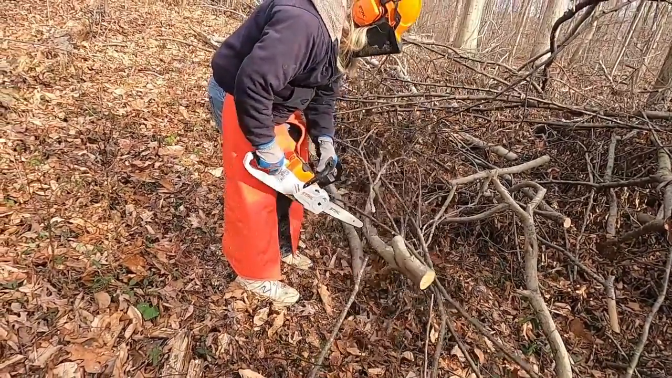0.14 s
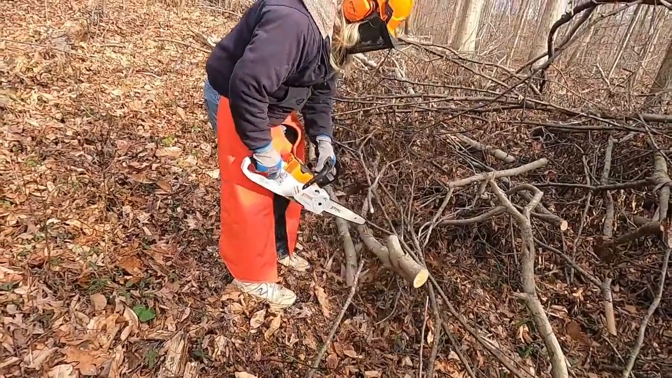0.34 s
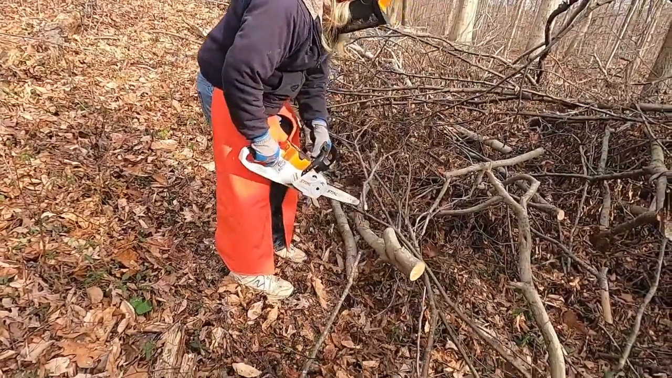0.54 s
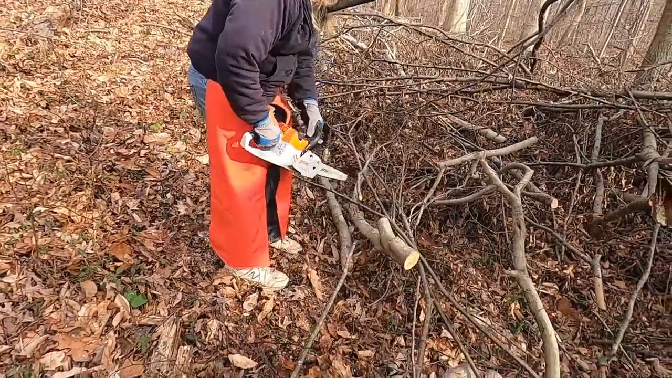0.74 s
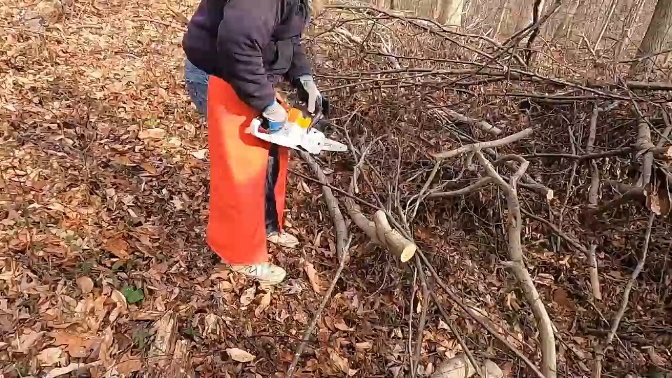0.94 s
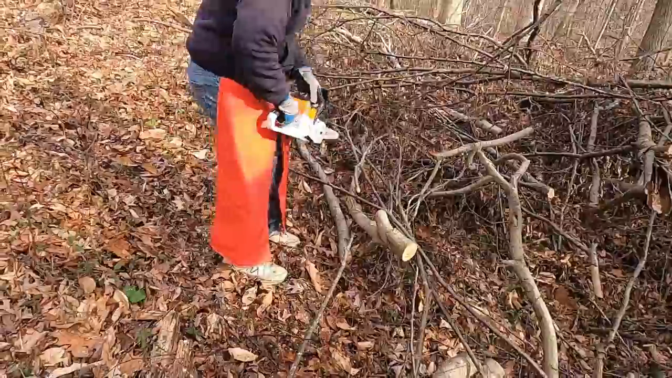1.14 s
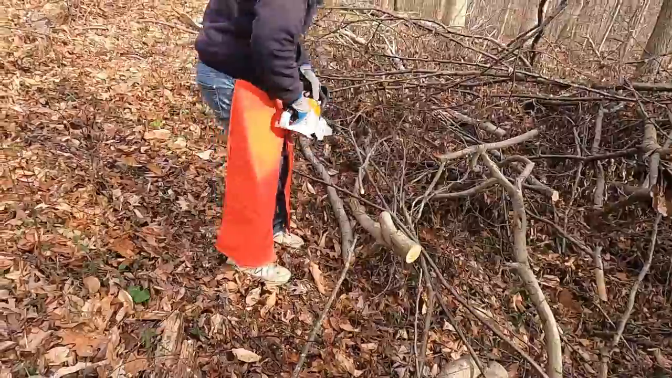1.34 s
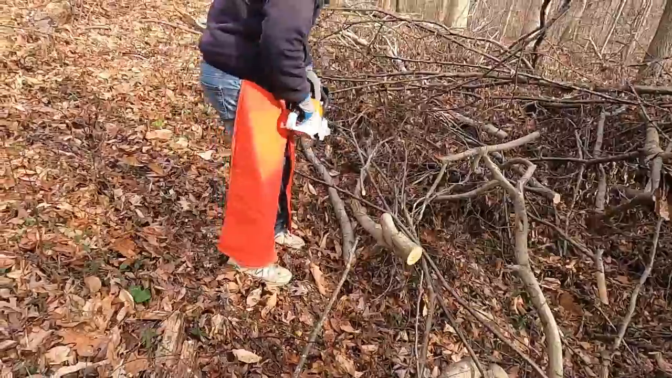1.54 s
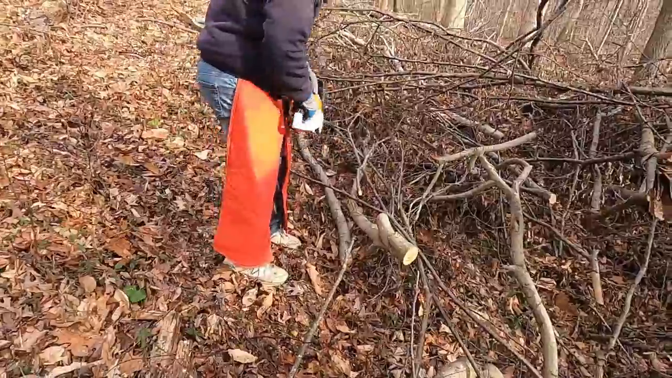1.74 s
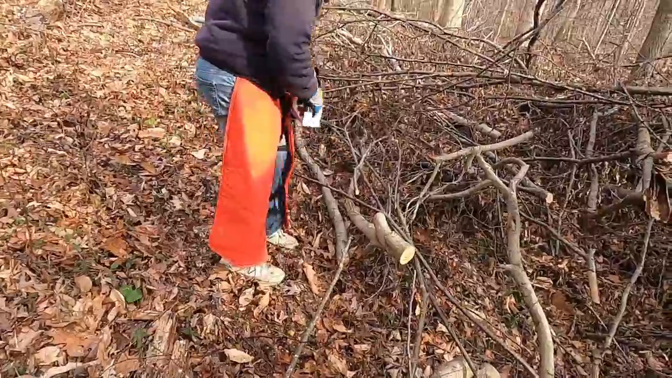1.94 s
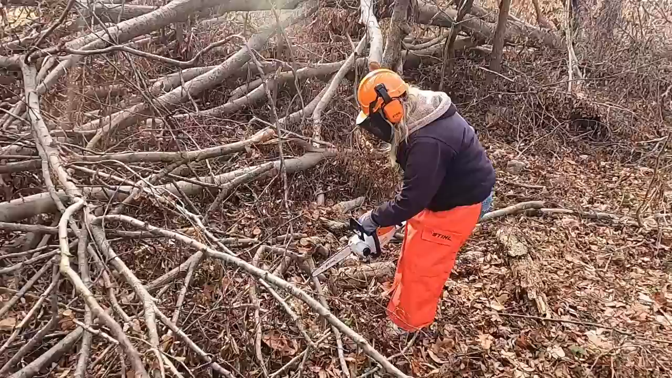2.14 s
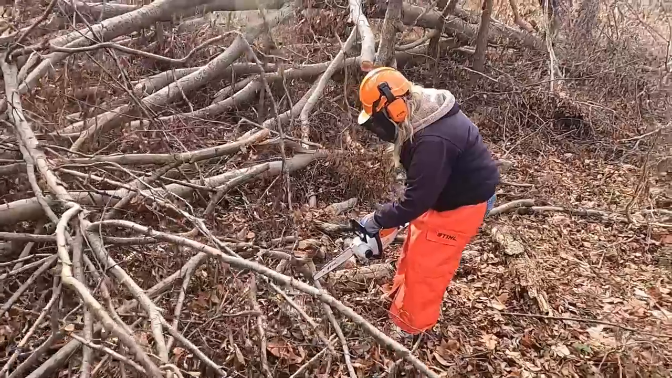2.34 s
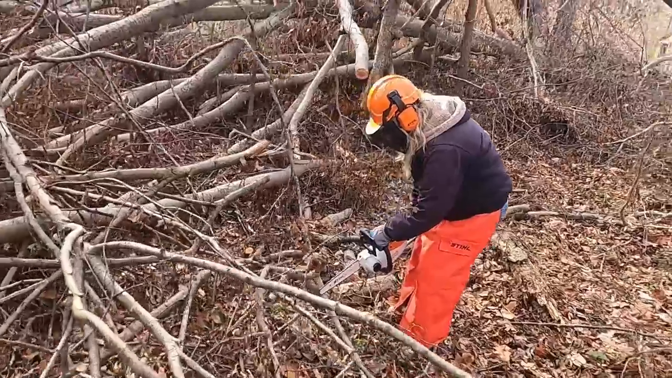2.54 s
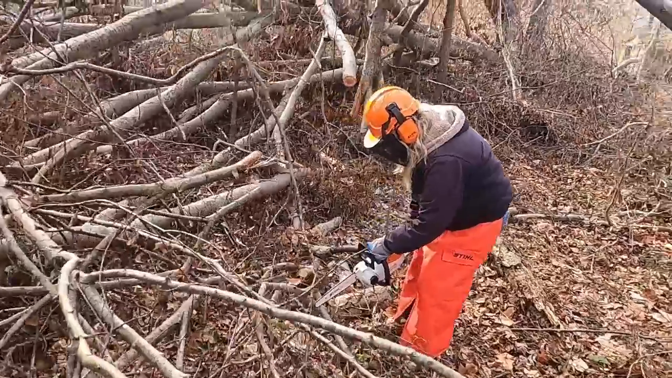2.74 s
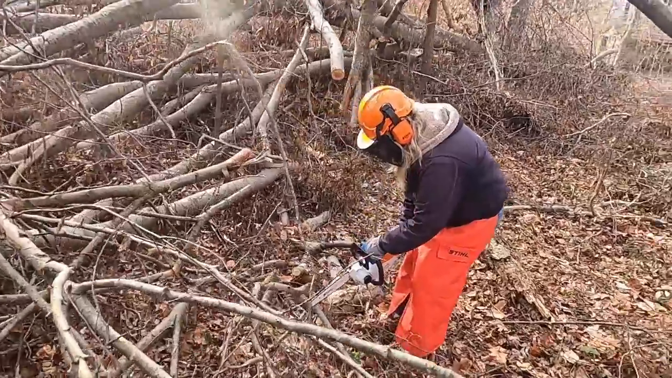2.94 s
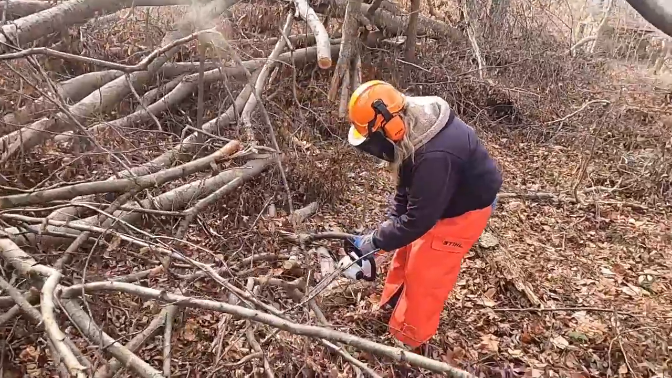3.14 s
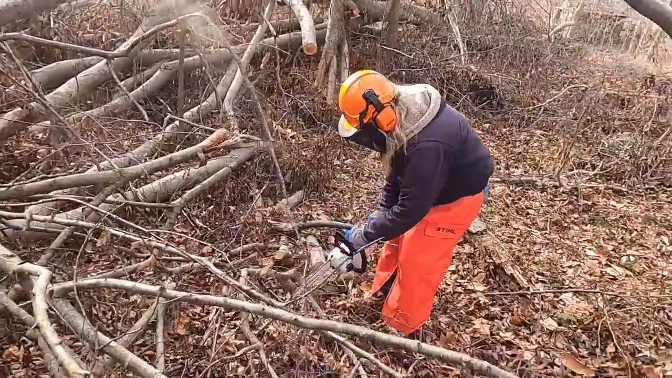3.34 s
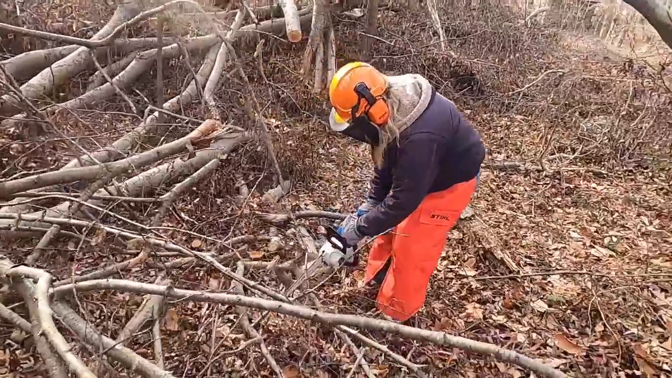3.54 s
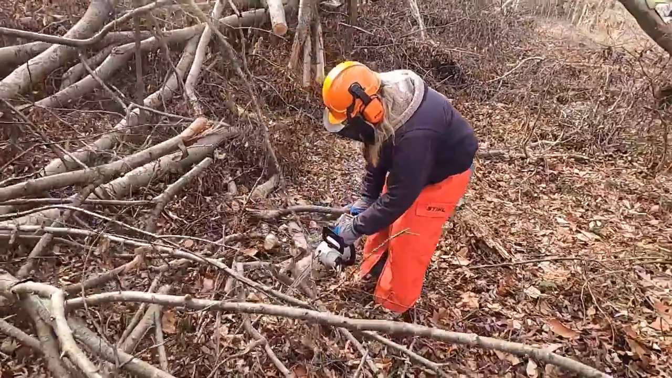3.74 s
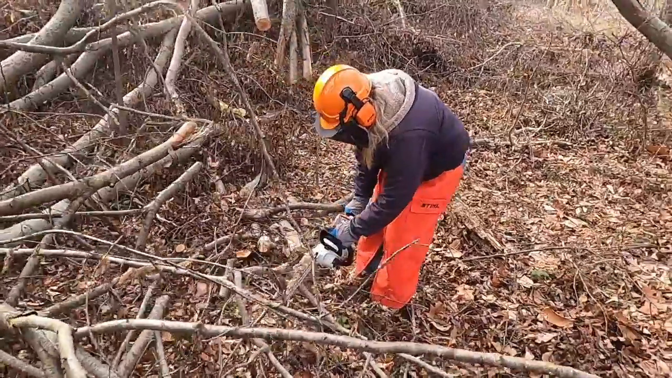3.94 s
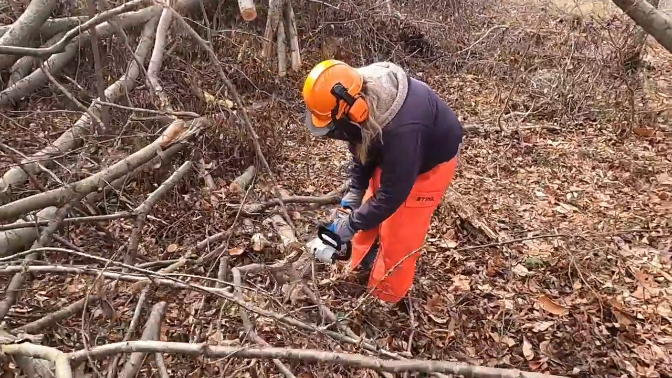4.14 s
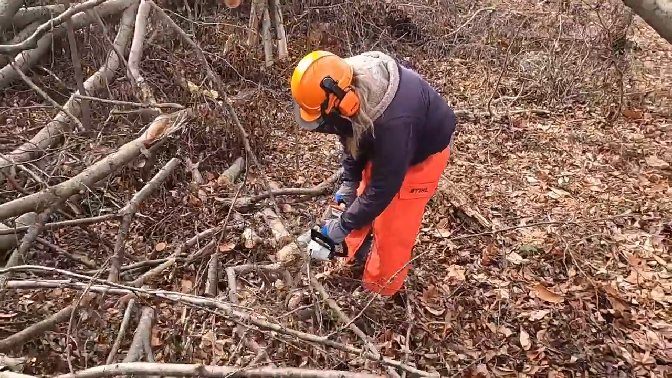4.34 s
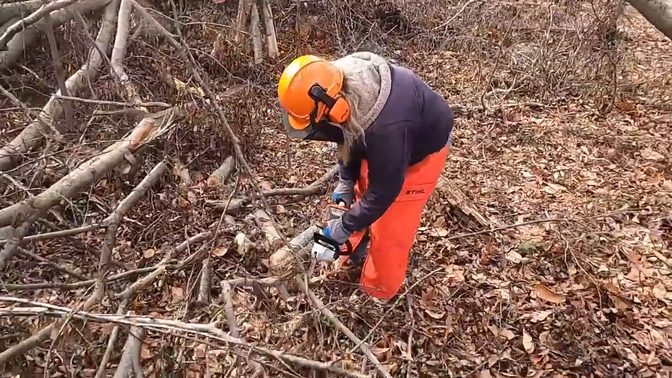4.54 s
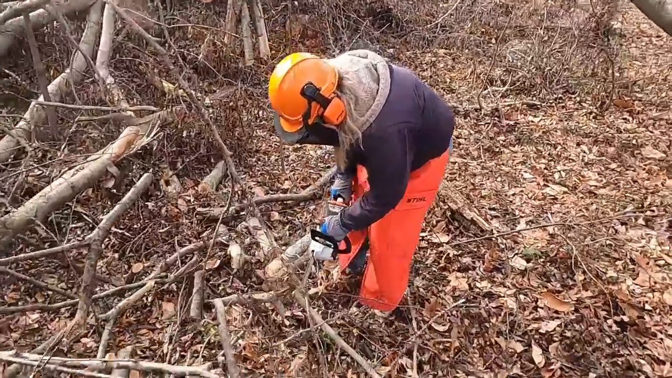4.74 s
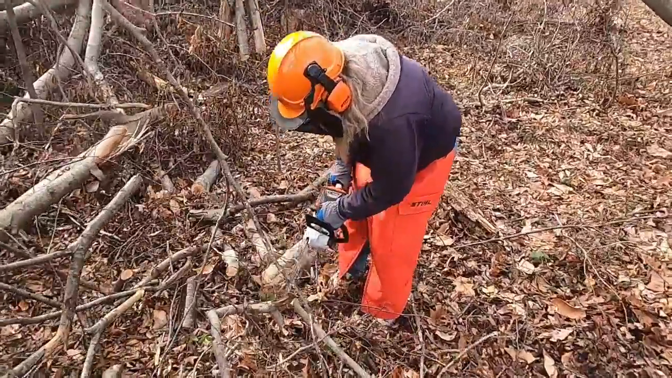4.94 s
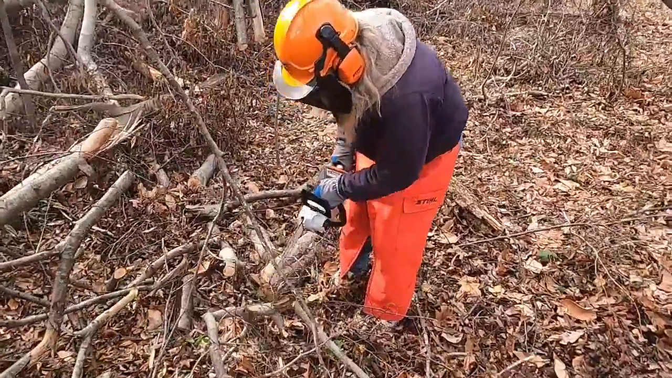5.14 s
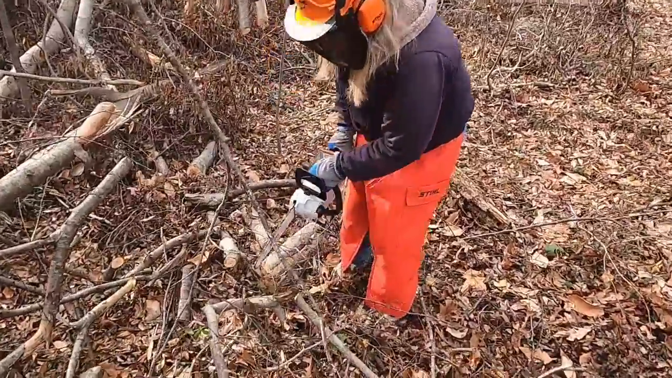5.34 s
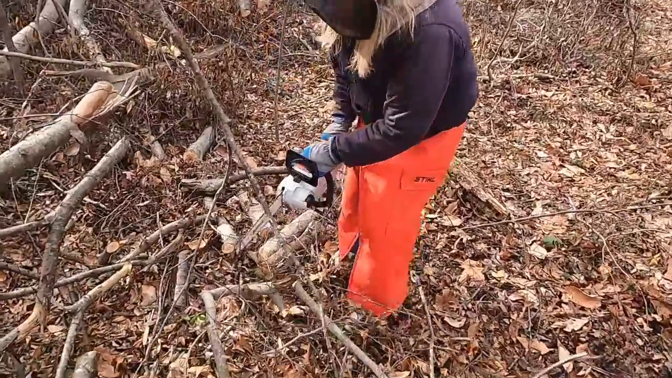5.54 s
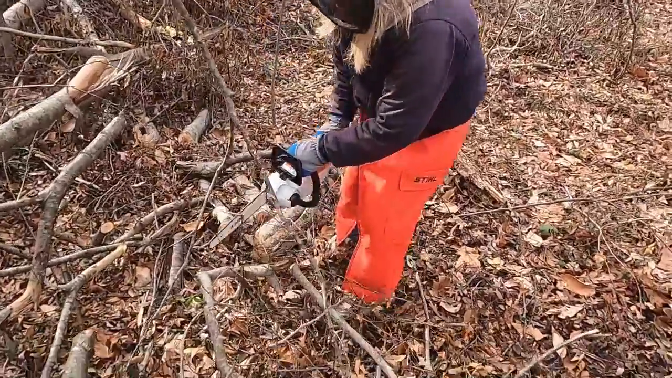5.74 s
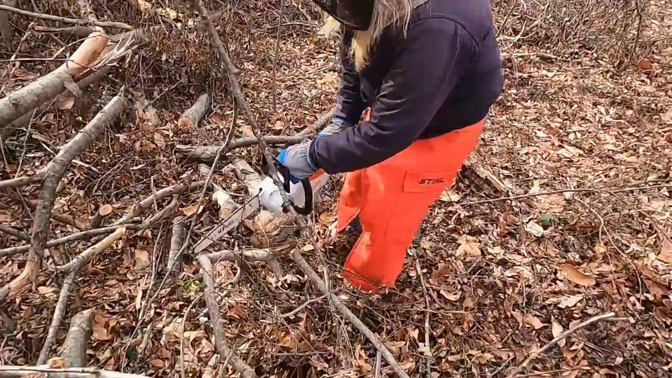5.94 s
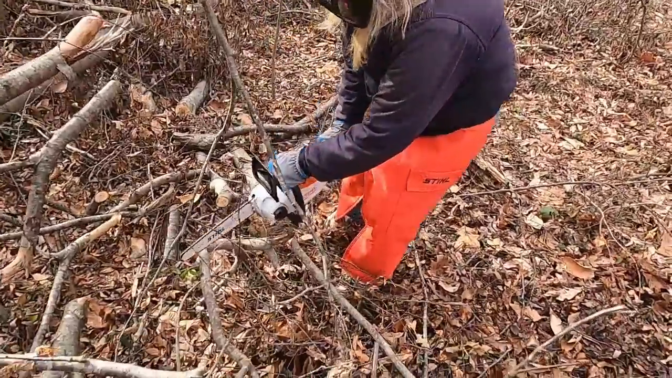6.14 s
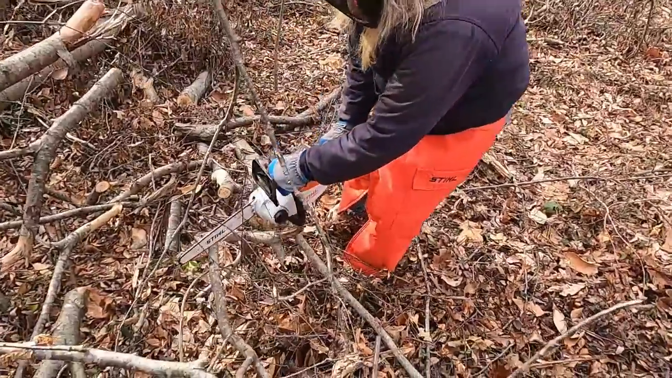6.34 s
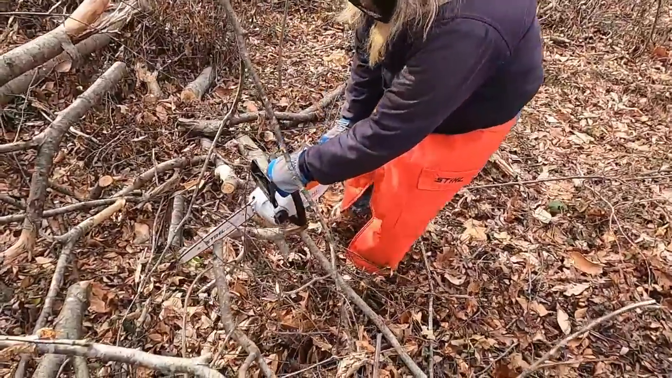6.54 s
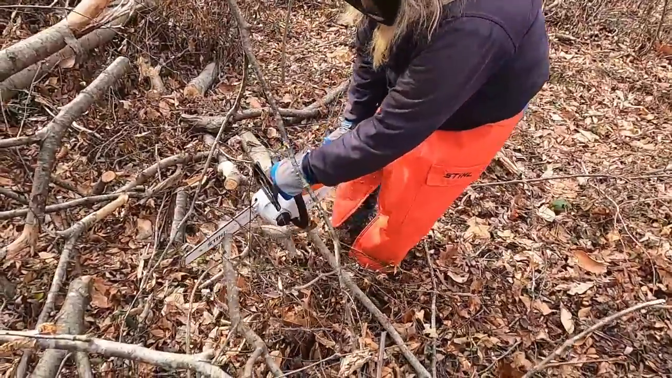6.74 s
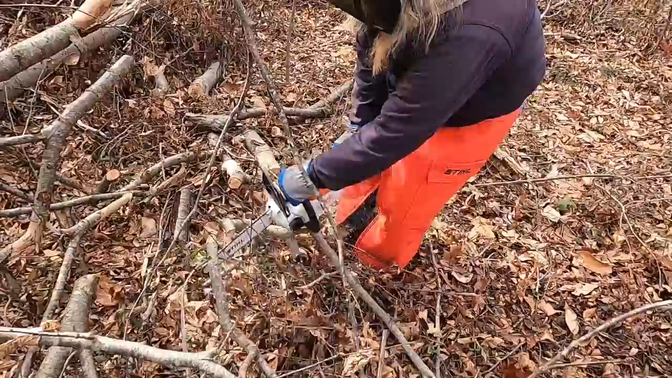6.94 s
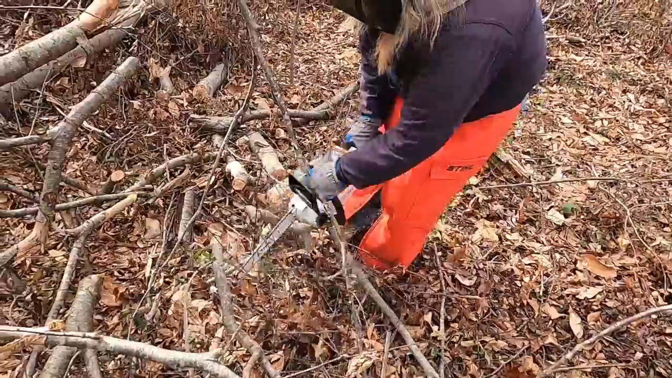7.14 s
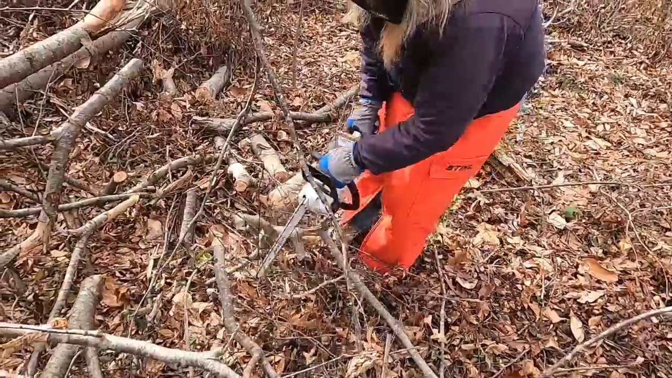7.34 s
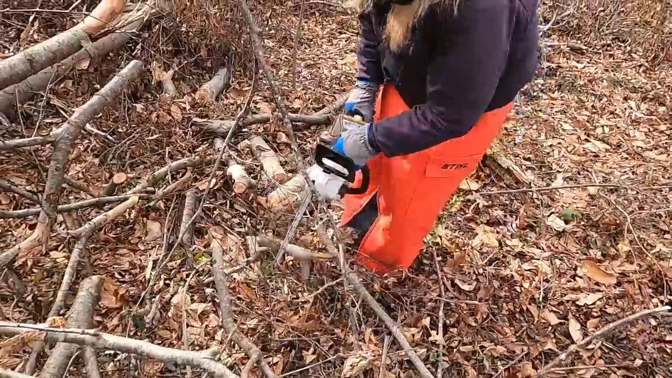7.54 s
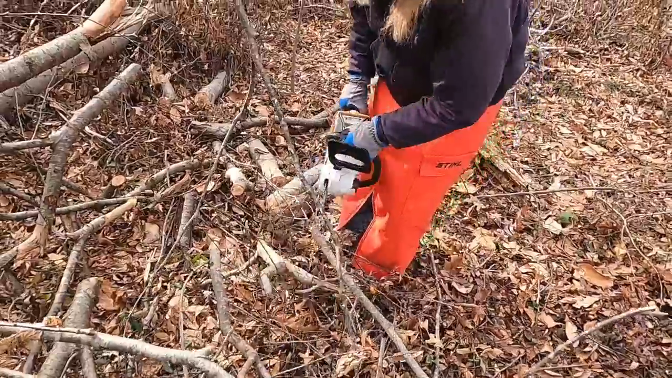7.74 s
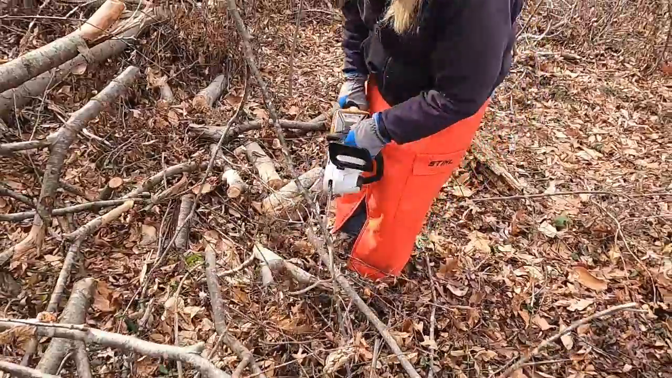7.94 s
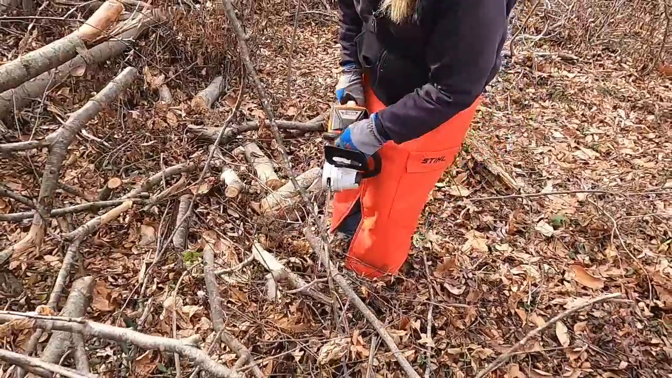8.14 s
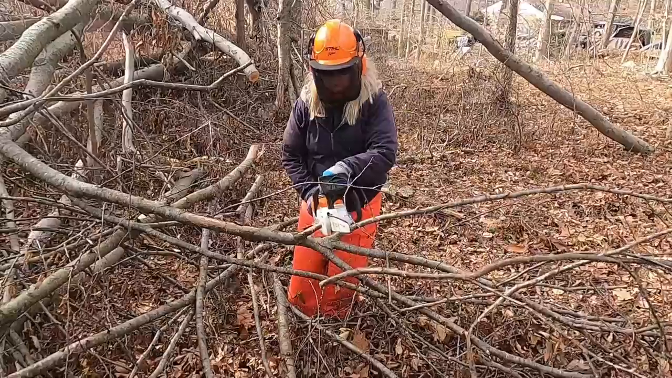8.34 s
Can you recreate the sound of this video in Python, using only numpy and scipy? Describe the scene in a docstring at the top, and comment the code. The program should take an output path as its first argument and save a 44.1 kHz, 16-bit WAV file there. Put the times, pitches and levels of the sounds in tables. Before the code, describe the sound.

A small electric chainsaw whines and rattles in short bursts among fallen branches, coasting down between cuts, with sharp wood snaps and dry leaf rustle.

```python
"""Battery chainsaw in woodland

A small saw spins up, runs and coasts down in short bursts among fallen branches.
Noise struck link by link excites bar and housing; sprocket mesh and motor shaft add harmonic lines.
Wood snaps, and the saw's stop clicks and chain jerk, are short filtered noise bursts.
Dry leaves rustle as trains of tiny crackles.
The faint air of open woodland, a wavering coloured noise, lies beneath them all."""
import sys
import numpy as np
from scipy import signal
from scipy.fft import rfft, irfft, next_fast_len
from scipy.io import wavfile
from scipy.ndimage import uniform_filter1d, minimum_filter1d, map_coordinates

SR = 44100
rng = np.random.default_rng(int(sys.argv[2]) if len(sys.argv) > 2 else 0)


def unload_audio(sound):
    """Save the sound as a 16-bit wav file, at the path given as the first command line argument."""
    columns = np.transpose(np.atleast_2d(sound))
    # keep every value between -1 and 1, then stretch to whole-number steps
    steps = np.round(np.clip(columns, -1, 1) * 32767)
    wavfile.write(sys.argv[1], SR, steps.astype(np.int16))


N = 369558
TIME = np.arange(N) / SR  # s
TOP_HZ = 14600  # upper edge of the whole sound

# Spectrum of the distant air among the trees: [f/Hz, level/dB]
AIR_SPECTRUM = [(15, -41), (25, -29.5), (59, -9), (128, -7.5), (176, -5), (262, -4.5), (334, -5.5),
                (634, -12.5), (873, -10.5), (946, -13), (1490, -15.5), (5230, -28.5), (6830, -34.5),
                (14800, -52)]
# Mean level of that air, about which it wavers: [t/s, level/dB]
AIR_LEVEL = [(0, -48.5), (1.1, -45.5), (1.5, -46.5), (2.0, -42.5), (2.4, -47.5), (5.5, -46.5),
             (8.38, -49.5)]
# Spectrum of brushed dry leaves: [f/Hz, level/dB]
LEAF_SPECTRUM = [(59, -45), (100, -7), (273, -5.5), (336, 3), (810, 1), (880, -3.5), (1550, 1), (4050, 0),
                 (6690, -11.5), (11100, -26), (14800, -48)]
# Pushes of dry leaves and twigs: [t/s of the height, level/dB, rise t/s, fall t/s]
RUSTLES = [(2.25, -31, 0.05, 0.045), (2.45, -38.5, 0.11, 0.27), (2.67, -26.5, 0.041, 0.082),
           (2.815, -25.5, 0.054, 0.021), (5.437, -36.5, .008, 0.051), (5.58, -36, 0.058, .1),
           (5.79, -24.5, 0.074, .08), (8.0, -37, 0.11, 0.084), (8.23, -40, .06, .04),
           (8.32, -35.5, 0.032, 0.038)]
# Snaps and knocks of wood, clicks of the stopping saw and a jerk of its chain, peak before a common
# treble cut: [t/s, peak level/dB, centre f/Hz, spread of the band as a ratio, t60 t/s]
SNAPS_AND_CLICKS = [(.981, -36.5, 4500, 1.1, .03), (1.006, -34, 2370, 0.9, .04),
                    (1.087, -36, 4600, 1.25, .02), (1.751, -31, 7600, 1.18, 0.022),
                    (1.162, -27, 4100, 1.15, 0.019), (1.435, -37, 3480, 1.16, .026),
                    (2.2368, 2.5, 3150, 1.9, 0.038), (2.2382, -6.5, 293, 1.68, 0.072),
                    (2.37, -21, 1880, 1.37, .012), (2.4242, -13.5, 1080, 2.4, .024),
                    (2.481, -8.5, 2280, 2.6, 0.011), (2.493, -14, 1790, 1.6, .01),
                    (2.544, -18, 2000, 1.6, .008), (2.5544, -2.5, 1310, 2.1, 0.027),
                    (2.565, -8, 2380, 1.56, .012), (2.5855, -18, 2200, 1.6, .012),
                    (2.6205, -9.5, 1950, 1.33, 0.024), (2.693, -3, 3420, 1.55, 0.013),
                    (2.695, -4, 776, 1.4, 0.0071), (3.844, -20, 316, 1.5, .13),
                    (4.4993, 7, 4830, 2.2, 0.0086), (5.4251, .5, 5530, 1.45, 0.015),
                    (5.425, -0.5, 890, 2.5, 0.031), (5.593, -19, 2500, 1.9, .018),
                    (5.711, -17, 4330, 1.08, .022), (5.7865, -5.5, 4020, 2.1, .04),
                    (5.8135, -14.5, 497, 1.47, .04), (5.848, -15, 590, 1.9, 0.027),
                    (5.955, -20, 1300, 1.2, .03)]
# Singing of the motor drive while it holds the rotor at a start or stop: [from t/s, to t/s, level/dB]
DRIVE_TONES = [(0.99, 1.046, -61), (2.65, 2.735, -64), (5.91, 5.95, -59)]

# Spectrum of bar and housing from the saw's right side: [f/Hz, level/dB]
RIGHT_SIDE = [(80, -45), (200, -22.5), (450, -2), (690, -16.5), (950, -6), (1700, 1), (2400, 5), (3000, -4),
              (3600, -11), (5400, -15.5), (6100, -11.5), (8400, -26), (10500, -21.5), (14500, -48)]
# The same from its left side: [f/Hz, level/dB]
LEFT_SIDE = [(80, -33), (200, -13.5), (350, -0.5), (650, -3.5), (950, -1), (1600, 1.5), (2300, 6),
             (2900, -4.5), (3600, -12), (4600, -13), (6700, -17.5), (8400, -31), (10300, -28.5),
             (14500, -51.5)]
# Resonances of the steel bar and chain: [f/Hz, width f/Hz, level/dB over the broad spectrum]
BAR_MODES = [(980, 26, -7), (1140, 720, 1.5), (1300, 16, -20), (2450, 36, -45), (2804, 104, -0.5),
             (4540, 260, -7), (6330, 870, -11)]
# Lines of motor and sprocket, amplitude against the rms link clatter, ahead of the body's resonances:
# [multiple of shaft speed, level/dB on the right side, level/dB on the left side]
SHAFT_ORDERS = [(1, -12, -18), (2, -27, -22), (3, -13, -20), (4, -25, -21), (5, -23, -24), (7, -21, -18),
                (8, -9.5, -18), (9, -22, -23), (10, -19, -20), (11, -25, -23), (13, -28, -28),
                (14, -25, -18), (15, -28, -25), (16, -24, -21), (24, -25, -17), (30, -21, -14.5),
                (32, -15, -29), (34, -26, -20), (36, -28, -25)]
# Radiation of a sprocket tone as it glides through the resonances:
# [f/Hz, level/dB on the right side, level/dB on the left side]
WHINE_RADIATION = [(585, -47, -44), (805, -32, -19), (815, -42, -26), (930, -28, -20.5), (997, -21, -34),
                   (1086, -37, -19), (1137, -28, -19), (1220, -31, -34), (1790, -34, -29.5),
                   (2080, -29, -22), (2193, -23, -30), (2213, -18.5, -23), (2380, -22, -25),
                   (3130, -28.5, -24.5), (3284, -45, -39.5)]
# Flutter of the whine and its 2nd and 3rd harmonic: [spread of level/dB] for each
WHINE_FLUTTER_DB = (1.0, 2.0, 2.8)
# Swell of the same three tones as the saw is turned in the hands: [spread of level/dB] for each
WHINE_SWELL_DB = (.4, 1.2, 1.2)
# A coasting sprocket bites less hard: [change of level/dB] of the same three tones
COASTING_DB = [-2.5, 1, -4]

# Shaft speed that the motor holds at full throttle: [t/s, turns per second f/Hz]
FULL_SPEED = [(0, 182.3), (.13, 185.8), (.2, 192), (.27, 192.1), (.42, 187), (3.25, 182), (3.5, 183.3),
              (3.8, 182.3), (4.06, 189.4), (4.3, 185), (4.55, 182.5), (4.64, 185.2), (4.86, 183.8),
              (6.42, 183), (6.6, 181.3), (6.8, 182.7), (7.02, 181.8), (7.1, 190.3), (7.2, 190), (7.43, 185),
              (8.345, 180)]
# Pulls of the trigger; with next to no spin-up the saw is already at speed when first heard:
# [start t/s, spin-up t/s, release t/s, side of the saw that faces us]
PULLS = [(0, .001, .418, "right"), (2.67, .575, 4.862, "left"), (5.87, .53, 7.428, "left"),
         (8.345, .001, 8.5, "right")]
# Strength of each pull, ahead of the laws of speed:
# [chain rattle level/dB, extra rattle at the start level/dB, hiss level/dB, knee speed while pulled f/Hz,
#  whine level/dB, its 2nd harmonic level/dB, its 3rd harmonic level/dB]
STRENGTHS = [(-18.5, 0, -28.5, 49, 1, -1.5, 4.5), (-21.5, 2.5, -28.5, 71, -0.46, -1.5, -2),
             (-21, 2, -28.5, 66, 0.3, -2, 1.5), (-19, 1, -27, 71, 11.5, -13, -2)]

# Unsteadiness of shaft speed (share), what slackness adds to it, and the speed at which the chain is taut
WOBBLE, SLACK_WOBBLE, TAUT_HZ = .0006, .005, 176
# After release, friction stops the chain in this time, braking a little less as it slows (power)
COAST_S, COAST_POWER = .705, 1.2
# Below a knee speed the chain grows quiet as a power of speed
COASTING_KNEE_HZ, COASTING_POWER, PULLED_POWER = 99.4, 2.15, 3.05
SETTLE_S = 1.09  # time in which the extra rattle of a start settles
SEATED_HZ = 96.4  # shaft speed above which the links seat evenly enough to sing
# Low clatter against the rattle, and what a fully slack chain adds to it
LOW_DB, SLACK_LOW_DB = -12, 0.5
# The whipping slack chain bends the pitch of its rings: swing of their timing, turns a second
WHIP_S, WHIP_RATE = .0016, 17
# A slack chain rattles in fits: spread of the flutter, turns a second
SLACK_SHAKE_DB, SLACK_SHAKE_RATE = 1.1, 75


def undb(db):
    """The decibel is a logarithmic ratio; this inverts it to an amplitude gain."""
    return 10 ** (np.asarray(db) / 20)


def unit(x, where=slice(None)):
    """Normalisation to unit rms, measured throughout or only where the source sounds."""
    return x / np.sqrt(np.mean(x[where] ** 2))


def walk(rate):
    """Smooth random fluctuation with about `rate` turns a second and unit rms."""
    knots = rng.standard_normal(4096)
    coarse_time = TIME[::16]
    curve = map_coordinates(knots, [coarse_time * rate], order=2, mode="wrap")
    return unit(np.interp(TIME, coarse_time, curve))


def band(x, lo_hz, hi_hz):
    """Causal band-pass, so that no response precedes its excitation."""
    sos = signal.butter(2, [lo_hz, min(hi_hz, .45 * SR)], "band", fs=SR, output="sos")
    return signal.sosfilt(sos, x)


def colour(x, points, modes=()):
    """Linear filtering by a spectral outline, multiplied by one plus its damped resonances."""
    size = next_fast_len(N + 4096)
    hz = np.arange(size // 2 + 1) * SR / size + 1e-3  # above zero for the logarithm
    at_hz, db = np.transpose(points)
    outline = undb(np.interp(np.log(hz), np.log(at_hz), db))
    rings = 1 + sum(undb(mode_db) / (1 + 1j * (hz - mode_hz) * 2 / width_hz)
                    for mode_hz, width_hz, mode_db in modes)
    return irfft(rfft(x, size) * rings * outline, size)[:N]


def sounding(times, fade=0.00067):
    """Linear gate: 1 between the first and last time, 0 outside, with fades (s) inside both ends."""
    return np.clip((TIME - times[0]) / fade, 0, 1) * np.clip((times[-1] - TIME) / fade, 0, 1)


def air(waver_db=1.5):
    """Broadband turbulence: distant wind is a low wash of noise whose level gently wavers."""
    wash = unit(colour(rng.standard_normal(N), AIR_SPECTRUM))
    level_db = np.interp(TIME, *np.transpose(AIR_LEVEL))
    return wash * undb(level_db + waver_db * walk(11))


def leaves(crackles=1100, scatter_db=2.2, crackle_db=-4):
    """Superposed impulses: tiny crackles of unequal size stud a soft brushing that swells and dies."""
    sizes = undb(scatter_db * np.minimum(rng.exponential(size=N), 4))
    hits = (rng.random(N) < crackles / SR) * sizes  # crackles a second
    decay = np.exp(-1 / (0.00094 * SR))  # time constant 0.94 ms
    grains = signal.lfilter([1], [1, -decay], hits) * rng.standard_normal(N)
    brushing = .5 * rng.standard_normal(N)
    rustle = unit(colour(undb(crackle_db) * unit(grains) + brushing, LEAF_SPECTRUM))
    power = sum(undb(db) ** 2 * np.exp(-((TIME - s) / np.where(TIME < s, rise, fall)) ** 2)
                for s, db, rise, fall in RUSTLES)
    return rustle * np.sqrt(power)


def snaps_and_clicks(tail_db=-24, tail_t60=0.21, crack=2.75):
    """Impulsive excitation: snap, knock, click or jerk is a crack, a brief noise burst and a faint tail."""
    out, t = np.zeros(N + SR), TIME[:SR // 4]
    for s, db, hz, spread, t60 in SNAPS_AND_CLICKS:
        burst_noise, tail_noise = rng.standard_normal((2, len(t)))
        burst = burst_noise * np.exp(-np.log(1000) * t / t60)
        tail = undb(tail_db) * tail_noise * np.exp(-np.log(1000) * t / tail_t60)
        push = burst + tail
        push[:4] += crack
        ratio = max(spread, 1.05)
        snap = band(push, hz / ratio, hz * ratio)
        start = int(s * SR)
        out[start:start + len(t)] += undb(db) * snap / np.abs(snap).max()
    return colour(out[:N], [(6500, -1.0), (8500, -18), (11000, -13), (15000, -36)])


def drive(switching_hz=8080):
    """Electronic switching: the brushless motor's drive emits a thin sine tone at a fixed frequency."""
    gate = sum(undb(db) * sounding((start, stop), fade=.008) for start, stop, db in DRIVE_TONES)
    return gate * np.sqrt(2) * np.sin(2 * np.pi * switching_hz * TIME)


def throttle(start, spin_up, release, rattle_db, surge_db, hiss_db, knee_hz, *whine_db):
    """Speed governs loudness: one pull gives shaft speed (Hz) and gains of rattle, hiss and three tones."""
    since, pulled = np.maximum(TIME - start, 0), TIME < release
    rise = np.sin(np.pi / 2 * np.minimum(since / spin_up, 1))
    coast = np.clip(1 - (TIME - release) / COAST_S, 0, 1) ** COAST_POWER
    full_hz = np.interp(np.minimum(TIME, release), *np.transpose(FULL_SPEED))
    hz = full_hz * rise * coast
    pulled_vigour = (hz / knee_hz) ** PULLED_POWER
    coasting_vigour = (hz / COASTING_KNEE_HZ) ** COASTING_POWER
    vigour = np.where(pulled, pulled_vigour, coasting_vigour)
    loudness = vigour / np.hypot(1, vigour)  # saturates above the knee
    surge = surge_db * np.exp(-(since / SETTLE_S) ** 4)
    seated = (hz / SEATED_HZ) ** 8
    singing = seated / (1 + seated)
    tones = [singing * np.where(pulled, undb(db), undb(db + change))
             for db, change in zip(whine_db, COASTING_DB)]
    return np.array([hz, loudness * undb(rattle_db + surge), loudness * undb(hiss_db), *tones])


def link_clatter(turns, running, scatter_db=1.5, ring=0.85, scrape=0.7, repeat=0.57, count=44):
    """Periodic impact: links strike with unequal force; the loop's uneven cutters scrape alike each lap."""
    links = 6 * turns  # six sprocket teeth
    force = undb(scatter_db * rng.standard_normal(16384))[links.astype(int) % 16384]
    strikes = force * np.exp(-(links % 1) / ring)
    lap_pattern = rng.standard_normal(count * 20)  # 20 points on each link of the loop
    cutters = map_coordinates(lap_pattern, [links * 20], order=3, mode="grid-wrap")
    return unit((rng.standard_normal(N) + repeat * cutters) * (scrape + strikes), running)


def shaft_lines(angle, hz, side, flutter_db=2.0):
    """Harmonics of rotation: they flutter in three groups, and the higher weaken more below full speed."""
    flutter = [undb(flutter_db * walk(25)) for _ in range(3)]
    reach = np.minimum(hz / 180, 1) ** .08
    lines = 0
    for i, (order, *db) in enumerate(SHAFT_ORDERS):
        tone = np.sin(order * angle + rng.uniform(0, 2 * np.pi))
        lines = lines + undb(db[side]) * flutter[i % 3] * reach ** order * tone
    return lines


def sprocket(angle, hz, slack, side, gains):
    """Tooth-mesh tones: six teeth whine; loose links mesh early or late, fraying upper harmonics most."""
    mesh, mesh_hz = 6 * angle, 6 * hz
    seating = .25 * np.minimum(2 * np.sqrt(slack), 1) * walk(220)  # phase error, rad
    at_hz, *radiated_db = np.transpose(WHINE_RADIATION)
    whine = 0
    for k, (gain, flutter_db, swell_db) in enumerate(zip(gains, WHINE_FLUTTER_DB, WHINE_SWELL_DB), 1):
        db = np.interp(k * mesh_hz, at_hz, radiated_db[side])
        db = db + flutter_db * walk(60) + swell_db * walk(7)
        whine = whine + gain * undb(db) * np.sin(k * (mesh + seating))
    return np.sqrt(2) * whine


def saw(facing, housing, shake_db=0.67, slap_db=5.5, body_db=0.0, whip_db=-1.5):
    """Forced resonance: clatter and shaft lines ring the housing, while the sprocket sings over them."""
    side = ["right", "left"].index(facing)
    pulls = [throttle(*timing, *strength)
             for (*timing, seen), strength in zip(PULLS, STRENGTHS) if seen == facing]
    hz, rattle_gain, hiss_gain, *whine_gains = sum(pulls)
    running = hz > 0
    # a slow chain hangs slack: it runs unevenly and slaps the bar's low rings
    slack = 1 - np.clip(hz / TAUT_HZ, 0, 1) ** 2
    unsteadiness = (WOBBLE + SLACK_WOBBLE * np.sqrt(slack)) * walk(110)
    turns = np.cumsum(hz * (1 + unsteadiness)) / SR
    angle = 2 * np.pi * turns

    excitation = link_clatter(turns, running) + shaft_lines(angle, hz, side)
    body = colour(running * excitation, housing, BAR_MODES)
    low = unit(colour(body, [(600, -1.5), (700, -1), (850, -7.5), (2000, -68)]), running)
    middle_outline = [(300, -21), (600, -12), (780, -3), (3200, 3.5), (4000, -15), (7000, -71)]
    middle = unit(colour(body, middle_outline), running)
    hiss = unit(colour(body, [(1500, -85), (3100, -4), (3900, 1)]), running)

    rings = colour(middle, [(700, -53), (910, 12), (1010, 3), (1120, 9.5), (1500, -58)]) / 2
    whipped_rings = np.interp(TIME + WHIP_S * walk(WHIP_RATE), TIME, rings)
    slap = slack * undb(slap_db + whip_db * walk(34)) * whipped_rings
    rattle = undb(body_db) * middle + slap + undb(LOW_DB + SLACK_LOW_DB * slack) * low
    shake = undb(shake_db * walk(35) + SLACK_SHAKE_DB * slack * walk(SLACK_SHAKE_RATE))
    clatter = (rattle_gain * rattle + hiss_gain * hiss) * shake
    return clatter + sprocket(angle, hz, slack, side, whine_gains)


def scene():
    """Superposition: all arrives from straight ahead, nearly mono; a faint delayed, filtered copy differs
    between the channels."""
    mid = air() + leaves() + snaps_and_clicks() + drive() + saw("right", RIGHT_SIDE) + saw("left", LEFT_SIDE)
    delayed = np.concatenate([np.zeros(SR // 100), mid])[:N]  # 10 ms later
    side = colour(delayed, [(120, -22.5), (500, -35), (1000, -56.5), (2000, -68), (4000, -33.5),
                            (8000, -27.5), (12000, -5.5)])
    return np.array([mid + side, mid - side])


def record(dry):
    """Peak limiting: a fast common gain holds down the sharpest peaks, and a low-pass cuts the top."""
    allowed = np.minimum(1, .78 / (np.abs(dry).max(axis=0) + 1e-9))
    gain = uniform_filter1d(minimum_filter1d(allowed, size=32), size=32)
    low_pass = signal.ellip(8, .2, 70, TOP_HZ, fs=SR, output="sos")
    return signal.sosfilt(low_pass, dry * gain)


dry = scene()
out = record(dry)
unload_audio(out)
```